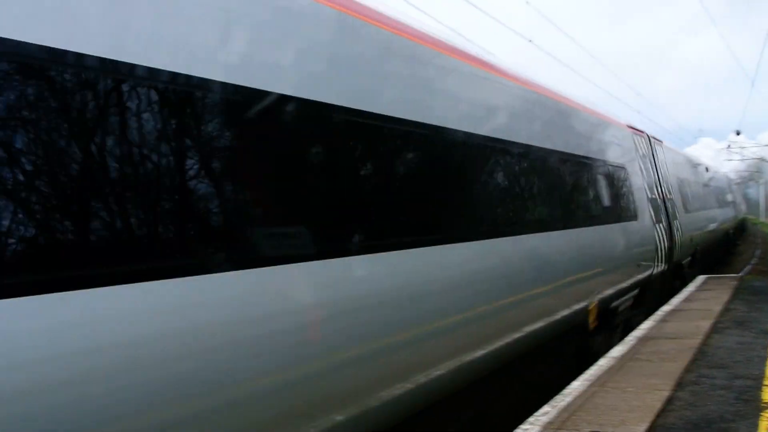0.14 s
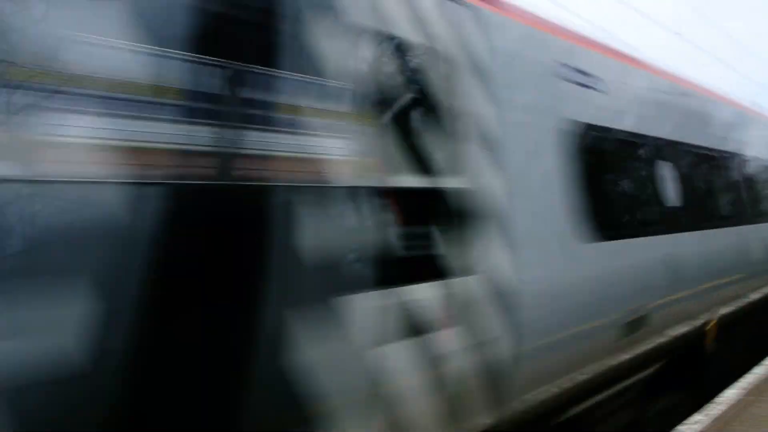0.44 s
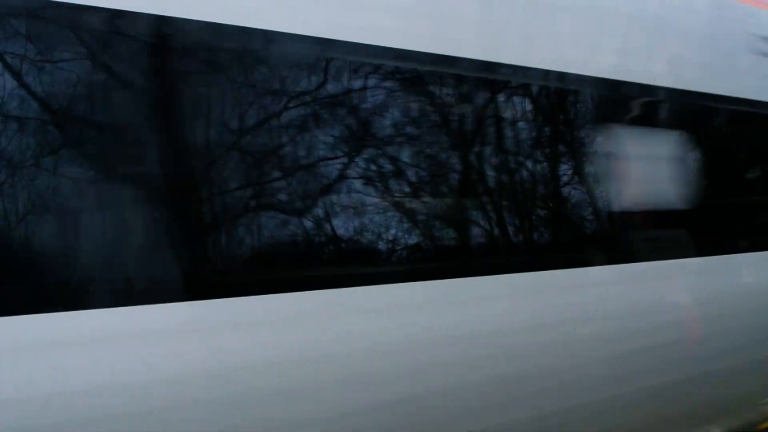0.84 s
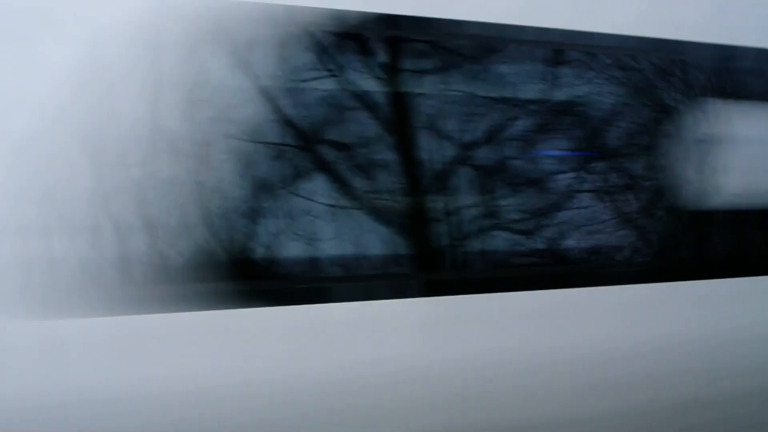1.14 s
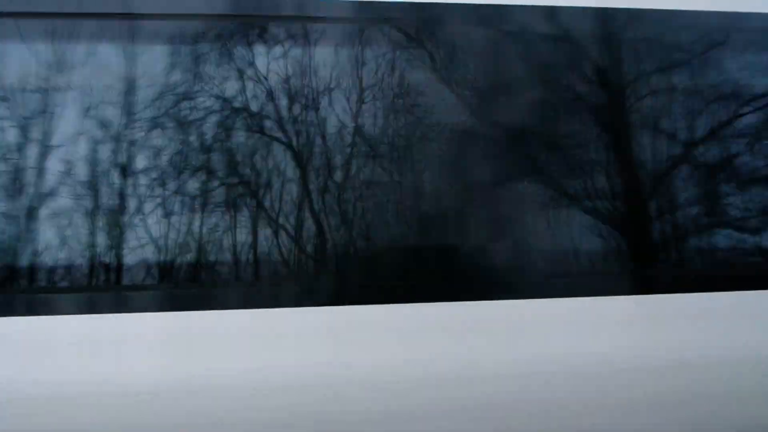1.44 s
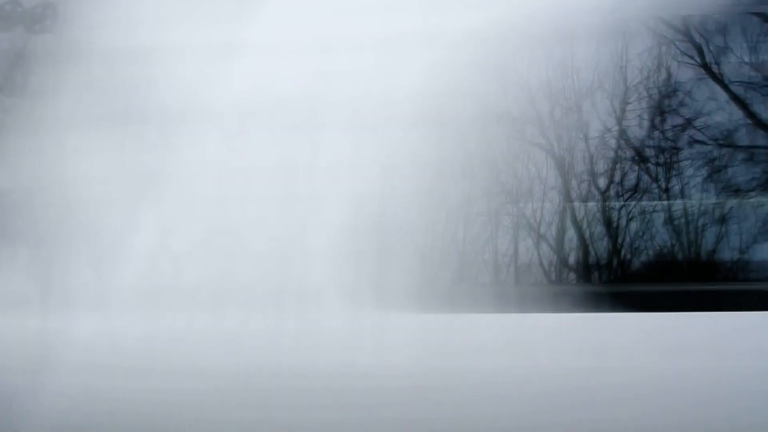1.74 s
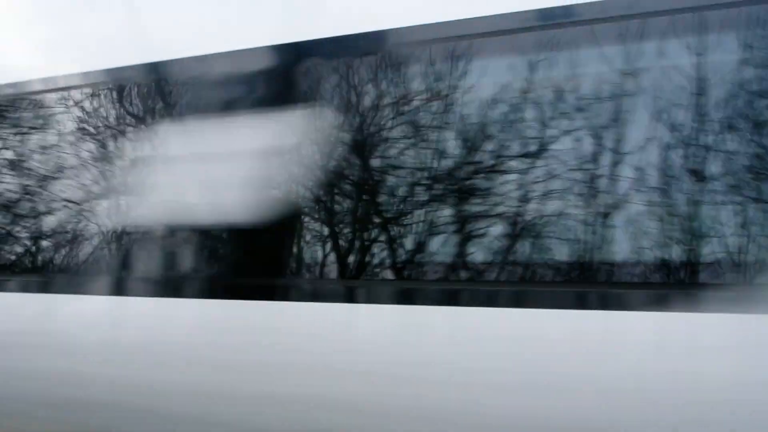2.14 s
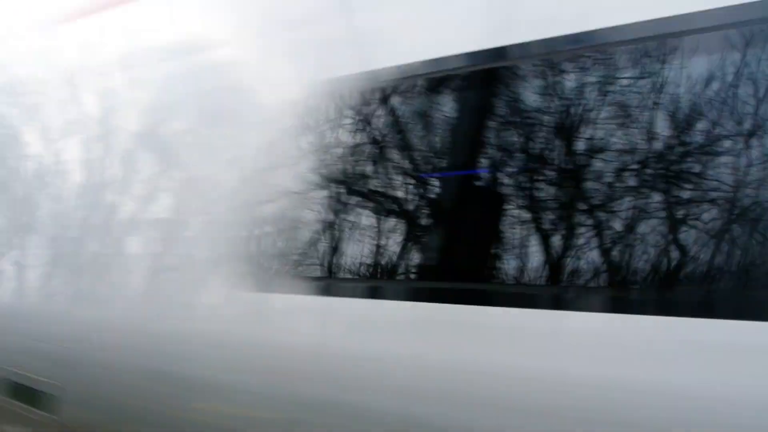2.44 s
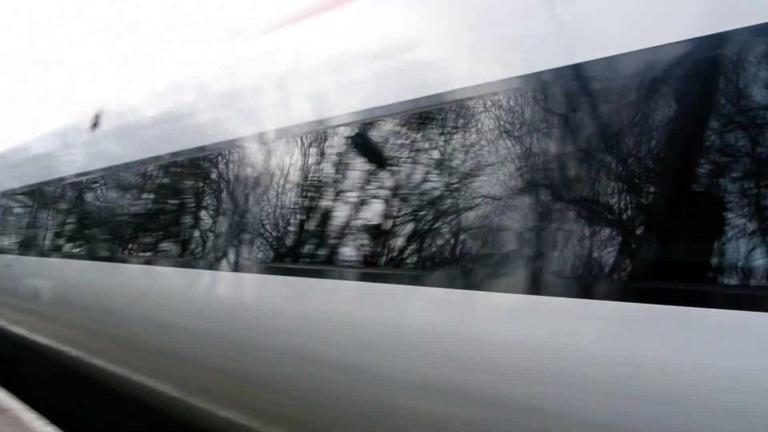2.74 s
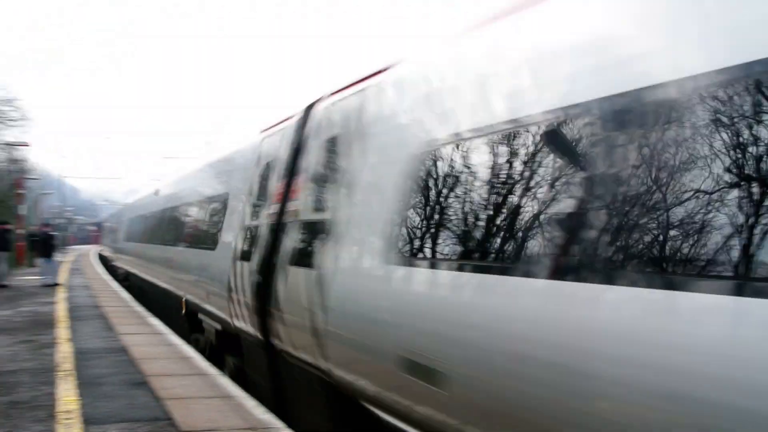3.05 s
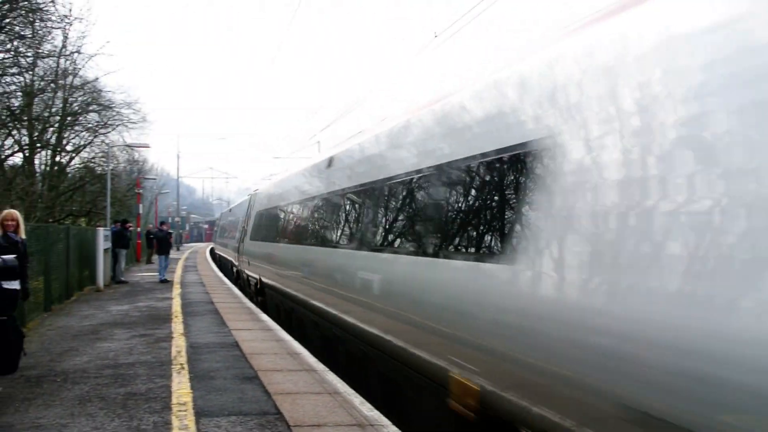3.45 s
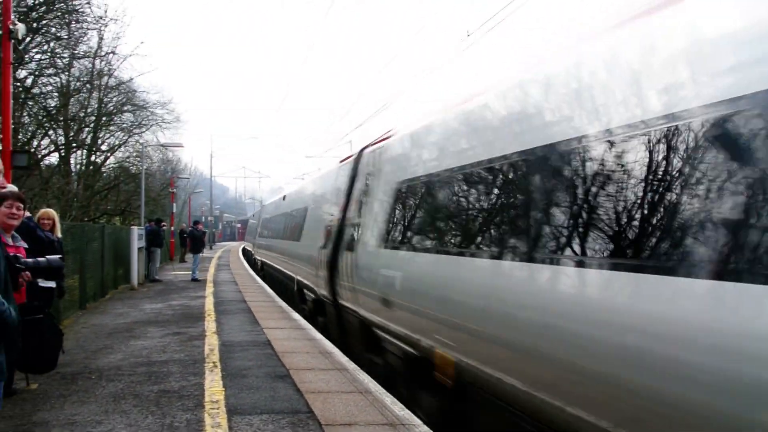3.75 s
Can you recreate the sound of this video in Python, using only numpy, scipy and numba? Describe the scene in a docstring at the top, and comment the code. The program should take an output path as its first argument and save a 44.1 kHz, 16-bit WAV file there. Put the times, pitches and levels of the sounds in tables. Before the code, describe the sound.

A fast passenger train rushes past a station platform with a loud, pulsing, hissing roar

```python
"""Fast train past a platform

A passenger train rushes by two metres from a hand-held camera that turns to follow it.
Wheels and rail roar in noise bands that swell as the bogies pass; the rail rings in resonances and sings
on one tone; wheels squeal in brief falling tones, and broad whooshes swell between.
Thin whistles under the cars sweep down in pitch by Doppler, each with a wide hiss of air."""
import sys
import numpy as np
from scipy import signal
from scipy.io import wavfile
from scipy.ndimage import uniform_filter1d
from numba import njit

SR = 44100
rng = np.random.default_rng(int(sys.argv[2]) if len(sys.argv) > 2 else 0)


def gain_from_db(level_db):
    """Turn a decibel level (scalar or array-like) into a linear amplitude factor."""
    decades = np.asarray(level_db, float) / 20
    return 10 ** decades


def materialize(psi):
    """Save the field psi as 16-bit PCM at rate SR to the path in sys.argv[1].

    A 1-D psi becomes a single channel; in a 2-D psi each row is a channel.
    """
    bounded = np.clip(np.atleast_2d(psi).T, -1, 1)
    quanta = np.round(bounded * 32767).astype(np.int16)
    wavfile.write(sys.argv[1], SR, quanta)


N = 171990  # samples, 3.9 s


def curve(points, hz):
    """Value of (Hz, value) points at hz, on a log frequency axis."""
    p = np.array(points, float)
    return np.interp(np.log(hz), np.log(p[:, 0]), p[:, 1])


def bump(x, centre, width):
    """A smooth bell-shaped swell, 1 at its centre."""
    return np.exp(-0.5 * ((x - centre) / width) ** 2)


def walk(rate):
    """Random levels held 1 / rate s and slewed twice; spread near 1."""
    hold = int(SR / rate)
    steps = np.repeat(rng.standard_normal(N // hold + 1), hold)
    return 1.17 * uniform_filter1d(uniform_filter1d(steps, hold), hold)[:N]


@njit
def svf(x, hz, width):
    """State-variable band-pass with a moving centre, gain 1 at the centre."""
    y, band_state, low_state = np.empty(len(x)), 0., 0.
    for i in range(len(x)):
        g, k = np.tan(np.pi * hz[i] / SR), width / hz[i]
        v = (band_state + g * (x[i] - low_state)) / (1 + g * (g + k))
        band_state = 2 * v - band_state
        low_state = low_state + 2 * g * v
        y[i] = k * v
    return y


def band(hz, width, size=N):
    """Noise through two equal resonances in a row, rms 1."""
    hz, width = np.clip(hz * np.ones(size), 10, 0.45 * SR), float(width)
    y = svf(svf(rng.standard_normal(size), hz, width), hz, width)
    return y / np.std(y)


def ports(hz, width, likeness, at, pan_db=0):
    """A noise band at both microphone ports: a common part read at samples `at`, plus each port's own part."""
    likeness, size = np.clip(likeness, 0, 1), at.shape[1]
    source = band(hz, width, size)
    common = np.array([np.interp(a, np.arange(size), source) for a in at])
    common /= np.std(common)
    own = np.array([band(hz, width, size), band(hz, width, size)])
    balance = gain_from_db(np.array([pan_db / 2, -pan_db / 2]).reshape(2, -1))  # positive: louder left
    return (np.sqrt(likeness) * common + np.sqrt(1 - likeness) * own) * balance


# How alike the two microphone ports hear a band: pitch_hz, common_share (of the power)
PORT_LIKENESS = [(40, 0.76), (125, 0.79), (640, 0.83), (1400, 0.53), (3100, 0.055), (8000, 0.18),
                 (15000, 0.041)]


def likeness_at(hz):
    """Share of the power common to both ports; the treble reaches them almost independently."""
    return curve(PORT_LIKENESS, hz)


RUMBLE_HZ, BODY_HZ, HISS_HZ, TOP_HZ = 98.5, 2480, 8100, 14700  # where each part of the roar rules

# The roar as the bogies pass, joined by straight lines: time_s, level_db, then the tilts
# rumble_db, hiss_db, top_hiss_db (each over the level, used less its own mean), and left_right_db of the hiss
ROAR_PASSING = [(0.0, -27.5, -7, -0.5, -8, 6), (0.08, -29, -11.5, 3, -3, 4.5),
                (0.17, -26, -17, -2.5, -8.5, 4), (0.35, -23.5, -13, -4, -5, 3),
                (0.41, -24.5, -14, -2.5, -3, 4), (0.51, -28, -14, 2, -2.5, 3),
                (0.72, -31.5, -12, 0, -5.5, 4.5), (0.95, -28, -13, 1, -2, 1.5),
                (1.05, -34, -19, 1, -6, 3.5), (1.11, -28, -21, -5.5, -4, 2.5),
                (1.26, -38.5, -6.5, -0.5, 3, 7.5), (1.51, -34.5, -11, 1, -4.5, -2),
                (1.6, -27.5, -18, 2.5, -0.5, 0), (1.98, -37, -8, 0.5, -4, 4.5),
                (2.15, -35.5, -9, 3.5, 0.5, -1.5), (2.25, -32.5, -18, 2, 1.5, 0),
                (2.65, -34.5, -18, -3.5, -1.5, 2), (2.77, -34.5, -16, 0.5, 0.5, -1.5),
                (3.01, -31.5, -21, -12.5, -7, -1), (3.05, -34.5, -25.5, -7, -3, 0),
                (3.23, -39, -10.5, -4, 5, 0.5), (3.41, -35.5, -15.5, -3, 1, -5.5),
                (3.53, -35.5, -17, -4, -15, -1), (3.59, -33, -18, -16, -8, -7),
                (3.67, -39, -16.5, -3, -16, 1.5), (3.9, -40.5, -13, -5.5, 12.5, -2.5)]


def roar_course(t):
    """Level, spectral tilts and left-right balance of the rolling noise over time."""
    rows = np.array(ROAR_PASSING, float)
    level_db, rumble, hiss, top, pan_db = (np.interp(t, rows[:, 0], c) for c in rows.T[1:])
    tilts = np.array([rumble, 0 * level_db, hiss, top])  # the body itself has no tilt
    tilts -= tilts.mean(axis=1, keepdims=True)
    return level_db, tilts, pan_db


def tilt_at(hz, tilts):
    """Tilt in dB at one pitch, blended between rumble, body, hiss and top."""
    centres = np.log([RUMBLE_HZ, BODY_HZ, HISS_HZ, TOP_HZ])
    weights = np.array([np.interp(np.log(hz), centres, e) for e in np.eye(4)])
    return weights @ tilts


# Average colour of the roar close to the track: pitch_hz, density_db (per Hz, relative)
ROAR_SPECTRUM = [(15, -40), (30, -27), (48, -6), (110, -8), (190, -2), (268, -4), (485, -5), (800, -1.5),
                 (1430, -7), (2380, 2.5), (3200, -12), (4540, 2), (6450, -11), (9000, -5.5), (12300, -5.5),
                 (15700, -2)]


def rolling_roar(t, at):
    """Wheels rolling on rail: third-octave noise bands, each flickering a little on its own."""
    level_db, tilts, pan_db = roar_course(t)
    out, shared_flicker = 0, walk(16)
    for hz in 31.27 * 2 ** (np.arange(28) / 3):
        colour_db = curve(ROAR_SPECTRUM, hz) + 10 * np.log10(hz / 1000) - 7.5  # wider bands hold more power
        flicker_db = 2.62 * walk(8.98) + 1.9 * walk(24.91)
        flicker_db = flicker_db + 0.78 * min(hz / 6000, 1) * shared_flicker  # the treble flickers together
        gain = gain_from_db(level_db + colour_db + tilt_at(hz, tilts) + flicker_db)
        out = out + gain * ports(hz, 0.43 * hz, likeness_at(hz), at, pan_db * min(hz / 3000, 1))
    return out


RAIL_BLUR_S, RAIL_BLUR_DB = 2.83, -2.5  # the resonances sink into the rush over half a second around 2.83 s: centre_s, dB

# Rail and wheel resonances: pitch_hz, width_hz, level_db (over the roar level)
RAIL_RESONANCES = [(609, 134, -9.5), (1211, 112, -11), (1745, 130, -9.5), (1896, 103, -10),
                   (4550, 570, -11), (9200, 120, -22)]


def rail_ringing(t, at):
    """Rail and wheels resonate on a few wavering tones, fed by the rolling."""
    level_db, tilts, pan_db = roar_course(t)
    blur_db = RAIL_BLUR_DB * np.clip(2 * (t - RAIL_BLUR_S) + 0.5, 0, 1)
    out = 0
    for hz, width, over_db in RAIL_RESONANCES:
        gain = gain_from_db(level_db + over_db + blur_db + tilt_at(hz, tilts) + 2.26 * walk(6.87))
        wavering_hz = hz * (1 + 0.0079 * walk(5.27))
        out = out + gain * ports(wavering_hz, width, likeness_at(hz), at, pan_db / 2)
    return out


WHISTLE_HZ, WHISTLE_WIDTH_HZ = 16480, 620  # pitch at the source
WHISTLE_AIR_HZ, WHISTLE_AIR_WIDTH_HZ = 14960, 6300
SPEED_M_S, DISTANCE_M = 40, 1.93  # train speed; nearest distance to the microphone
BEAM_M, BEAM_WIDTH_M, TAIL_DB = 2.6, 1.6, -8  # loudest just after passing, faint tail
AIR_BEAM_M, AIR_SPREAD_M = 3.4, 5.6  # the hiss peaks later and spreads wider

# Whistles going by under the cars: abreast_s, tone_db, hiss_db, left_right_db
PASSING_WHISTLES = [(1.07, -31, -28, 5), (1.17, -36, -35, 16), (1.795, -37, -39, 18), (2.2, -44, -30, 9),
                    (2.84, -34, -26, -3), (2.95, -18, -20, 2.5), (3.375, -31, -22.5, -2),
                    (3.551, -18, -16.5, 0.5), (3.88, -40, -13.5, 3)]


def whistles(t, at):
    """Air whistles on the moving cars: Doppler bends the pitch down; a wide hiss comes along."""
    out = np.zeros((2, N))
    for abreast, tone_db, hiss_db, pan_db in PASSING_WHISTLES:
        i = slice(int((abreast - 0.5) * SR), int((abreast + 0.6) * SR))
        here = at[:, i] - i.start
        along = SPEED_M_S * (t[i] - abreast)  # metres past the microphone
        r = np.hypot(along, DISTANCE_M)
        hz = WHISTLE_HZ / (1 + SPEED_M_S / 343 * along / r)  # 343 m/s: speed of sound
        edge = np.hanning(len(r))
        beam = bump(along, BEAM_M, BEAM_WIDTH_M) + gain_from_db(TAIL_DB) * edge * DISTANCE_M / r
        spread = edge / (1 + ((along - AIR_BEAM_M) / AIR_SPREAD_M) ** 2)
        tone = ports(hz, WHISTLE_WIDTH_HZ, 0.43, here, pan_db)
        hiss = ports(WHISTLE_AIR_HZ, WHISTLE_AIR_WIDTH_HZ, 0.076, here, pan_db)
        out[:, i] += gain_from_db(tone_db) * beam * tone + gain_from_db(hiss_db) * spread * hiss
    return out


SQUEAL_WIDTH = 0.04  # share of the pitch
SKIRT_WIDTH, SKIRT_DB = 0.12, -1  # rough noise around it: share of the pitch, dB over the tone

# Brief wheel squeals and low rail hums: centre_s, pitch_hz, level_db (of the tone), length_s,
# fall_hz_per_s (at the centre), left_right_db
SQUEALS_AND_HUMS = [(0.072, 8100, -32, 0.019, 4300, 14), (0.406, 5100, -32, .015, 500, 4),
                    (0.414, 4640, -34, 0.13, 140, -10), (0.542, 4580, -26.5, .035, 540, -1),
                    (0.232, 1940, -30.5, 0.04, 270, 9), (.39, 1920, -30.5, 0.05, 300, 0),
                    (0.248, 2575, -32, .03, 300, 4), (0.669, 8200, -36, 0.036, 8100, 16),
                    (0.955, 4490, -21.5, .032, 3000, 1), (1.676, 5420, -31, 0.026, 2000, 3),
                    (1.795, 4080, -34, 0.031, 1500, -2), (2.874, 3940, -36, 0.051, 590, -1),
                    (0.543, 611, -31.5, 0.026, 17, 5), (1.7, 606.5, -41, 0.11, 150, 4),
                    (2.268, 585, -41, 0.06, 20, 7), (2.43, 579, -37.5, 0.035, 20, 8),
                    (2.884, 588, -39.5, 0.04, 18, 1)]


def squeals(t, at):
    """Each squeal or hum is a narrow noisy tone in a rough skirt that swells, falls in pitch and dies."""
    out = np.zeros((2, N))
    for centre, hz, db, length, fall, pan_db in SQUEALS_AND_HUMS:
        i = slice(max(int((centre - 4 * length) * SR), 0), int((centre + 4 * length) * SR))
        here = at[:, i] - i.start
        glide = hz - 2 * fall * length * np.tanh((t[i] - centre) / (2 * length))
        tone = ports(glide, SQUEAL_WIDTH * hz, 0.2, here, pan_db)
        skirt = ports(glide, SKIRT_WIDTH * hz, 0.15, here, pan_db)
        out[:, i] += gain_from_db(db) * bump(t[i], centre, length) * (tone + gain_from_db(SKIRT_DB) * skirt)
    return out


SING_HZ, SING_WIDTH_HZ = 2338, 22

# The rail sings between bogies: centre_s, length_s, level_db (of the core)
RAIL_SONG = [(.15, 0.07, -34.5), (.77, 0.12, -34), (1.1, 0.07, -41), (1.38, 0.052, -34.5),
             (1.7, 0.046, -36), (1.98, 0.098, -36), (2.3, 0.065, -36.5), (2.55, 0.071, -37),
             (2.67, 0.04, -42.5)]


def singing(t, at):
    """One rail tone, a wavering core in a narrow blur, that comes and goes."""
    out = 0
    for centre, length, db in RAIL_SONG:
        blur = gain_from_db(-2.0) * ports(SING_HZ + 9 * walk(7.9), SING_WIDTH_HZ, 0.33, at)
        core = gain_from_db(2.0 * walk(14.3)) * np.sin(2 * np.pi * SING_HZ * at / SR + 1.7 * walk(12))
        out = out + gain_from_db(db) * bump(t, centre, length) * (blur + core)
    return out


# Broad whooshes, as of gaps between cars, and an early low roar: centre_s, pitch_hz, level_db, length_s, width_hz
WIDE_SWELLS = [(0.103, 287, -30, 0.2, 315), (.385, 5900, -24, 0.029, 9000), (0.959, 1500, -32, 0.066, 4000),
               (1.622, 1800, -42, 0.11, 5000), (2.988, 1500, -37, 0.022, 3500),
               (3.588, 1700, -30, 0.038, 4000)]


def whooshes(t, at):
    """Rushes of air: wide noise bands that swell and die."""
    out = np.zeros((2, N))
    for centre, hz, db, length, width in WIDE_SWELLS:
        i = slice(max(int((centre - 0.6) * SR), 0), int((centre + 0.6) * SR))
        noise = ports(hz, width, likeness_at(hz), at[:, i] - i.start)
        out[:, i] += gain_from_db(db) * bump(t[i], centre, length) * noise
    return out


TURN_S, TURN_SPAN_S, PORT_LAG_S = 1.55, 0.2, 0.00011  # the camera swings through the side view


def scene():
    """All sources at both ports; the lag between the ports flips as the camera turns."""
    t = np.arange(N) / SR
    lag = PORT_LAG_S * SR / 2 * np.tanh((t - TURN_S) / TURN_SPAN_S)  # samples, half for each port
    at = np.arange(N) + np.array([-lag, lag])
    train = rolling_roar(t, at) + rail_ringing(t, at) + whistles(t, at)
    return train + squeals(t, at) + singing(t, at) + whooshes(t, at)


def roll_off(x):
    """The treble ends steeply here."""
    return signal.sosfilt(signal.butter(12, 16020, fs=SR, output="sos"), x)


def record(dry):
    """The camera cuts the top steeply above 15690 Hz."""
    low_pass = signal.ellip(14, 0.2, 90, 15690, fs=SR, output="sos")
    mix = signal.sosfilt(low_pass, dry)
    return roll_off(mix)


dry = scene()
out = record(dry)
materialize(out)
```